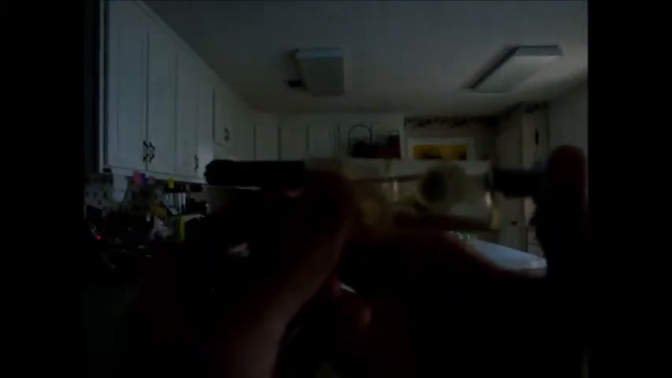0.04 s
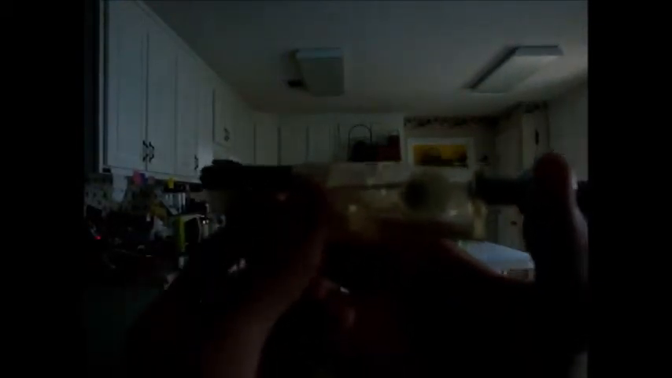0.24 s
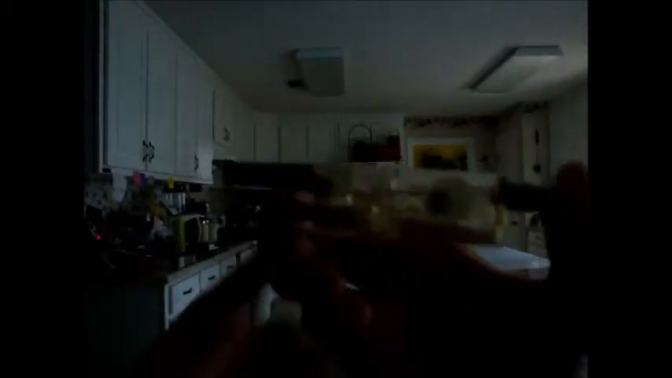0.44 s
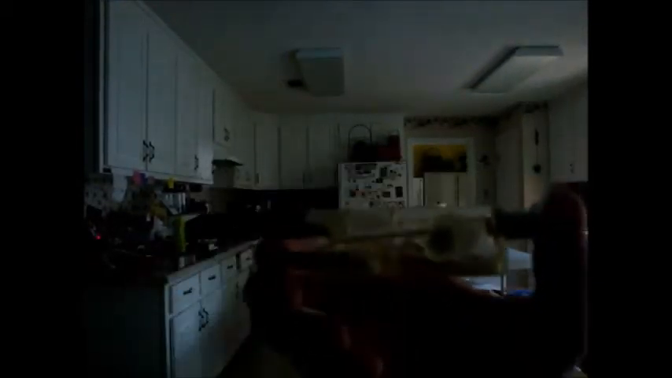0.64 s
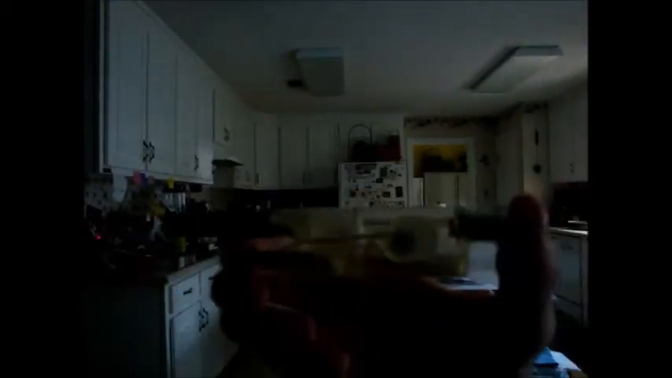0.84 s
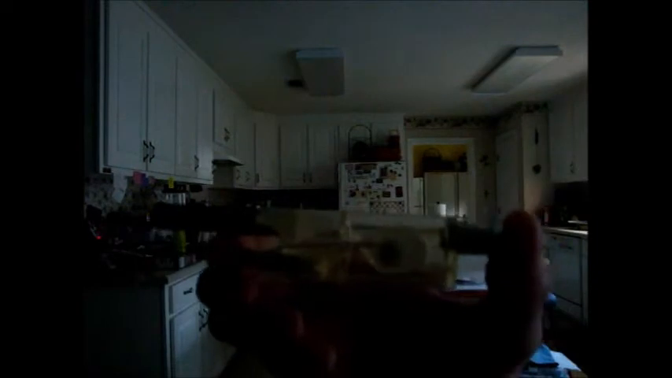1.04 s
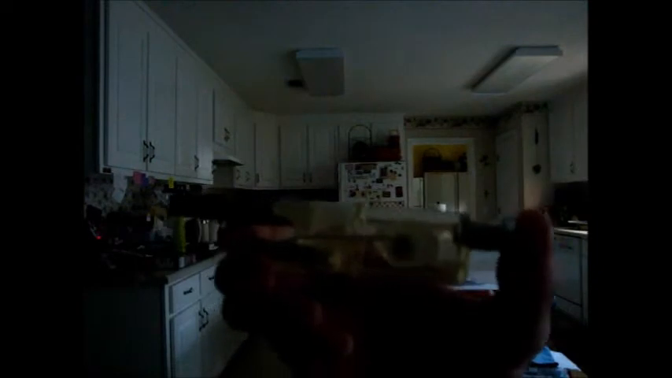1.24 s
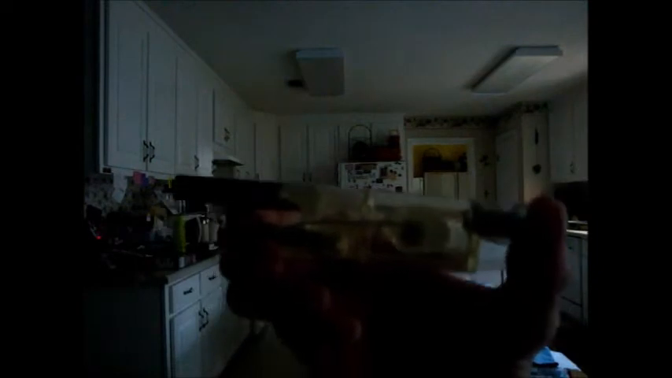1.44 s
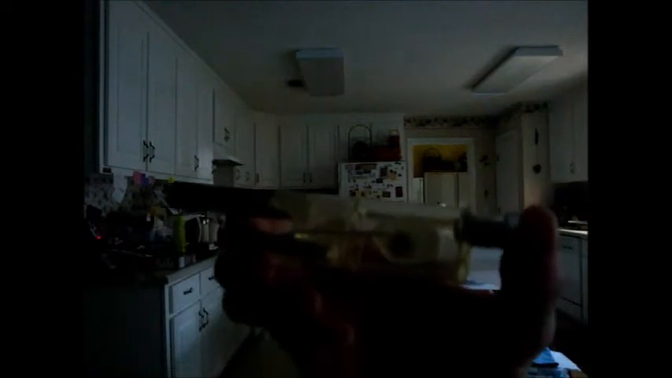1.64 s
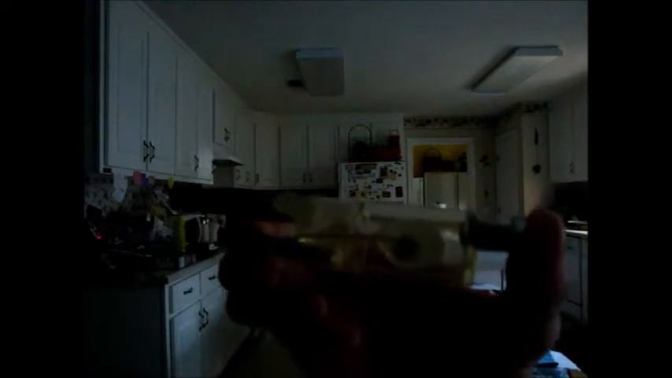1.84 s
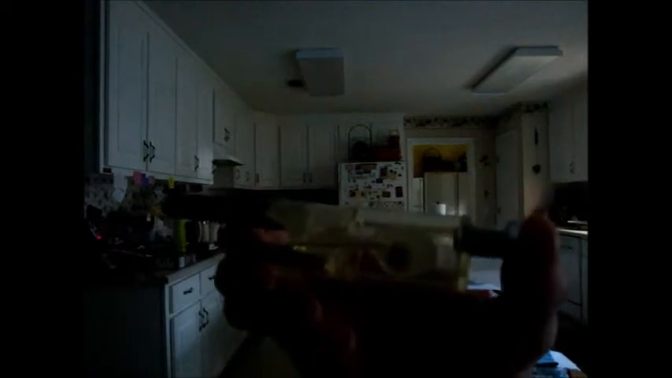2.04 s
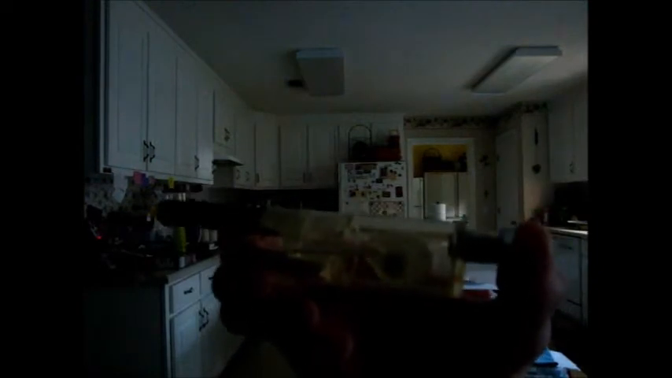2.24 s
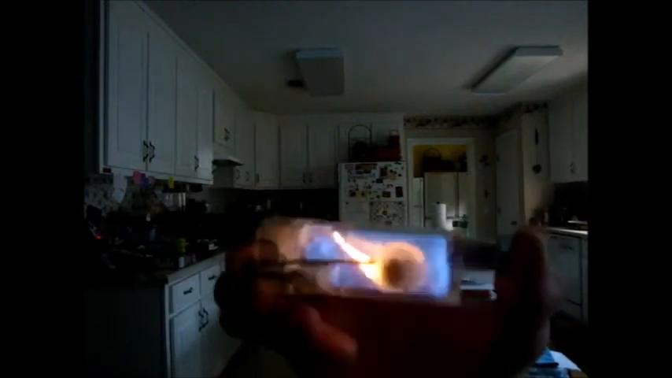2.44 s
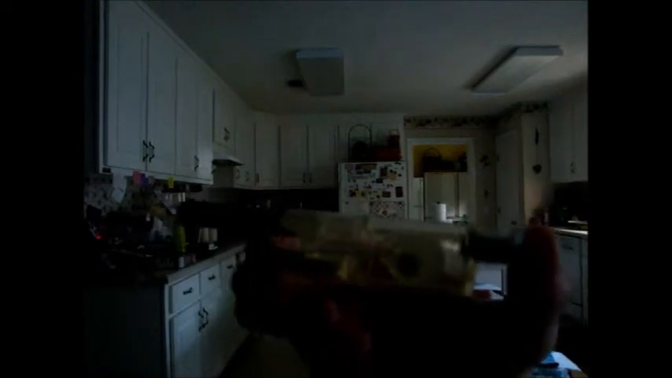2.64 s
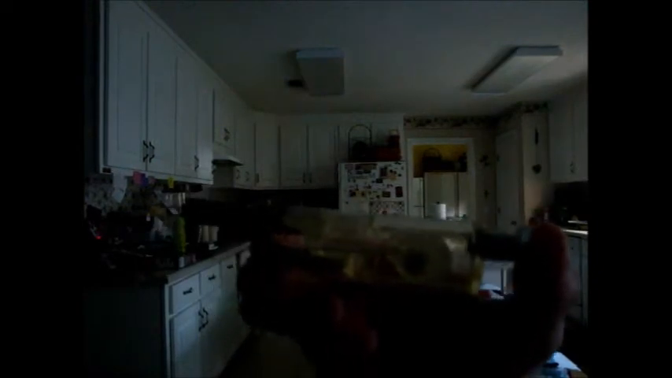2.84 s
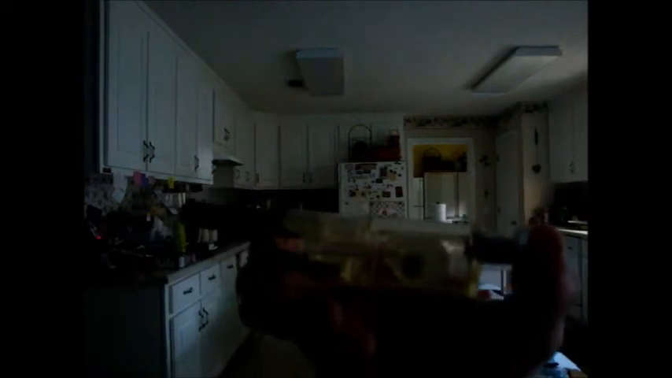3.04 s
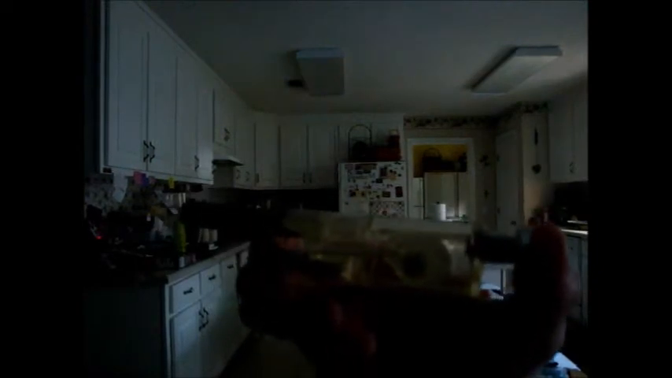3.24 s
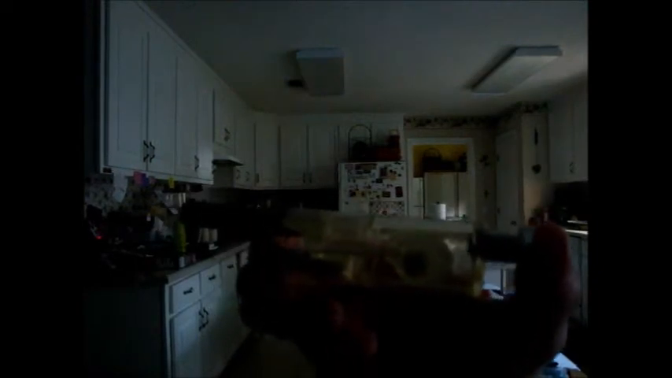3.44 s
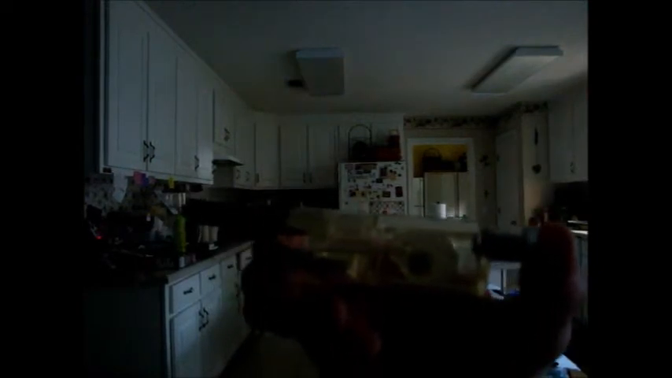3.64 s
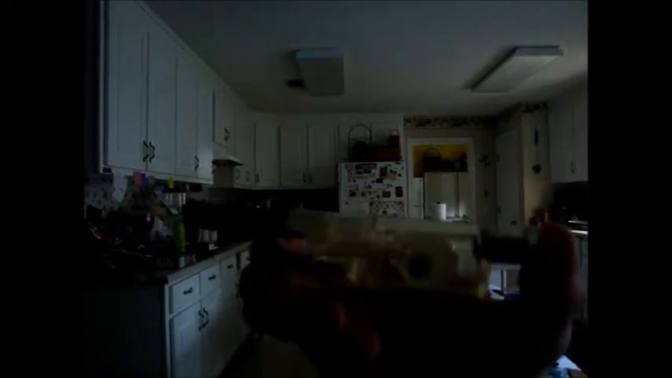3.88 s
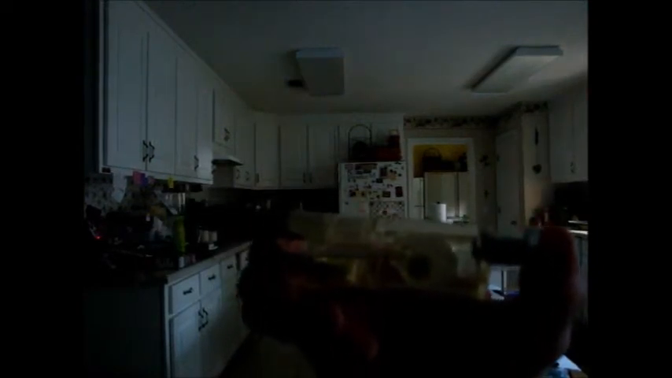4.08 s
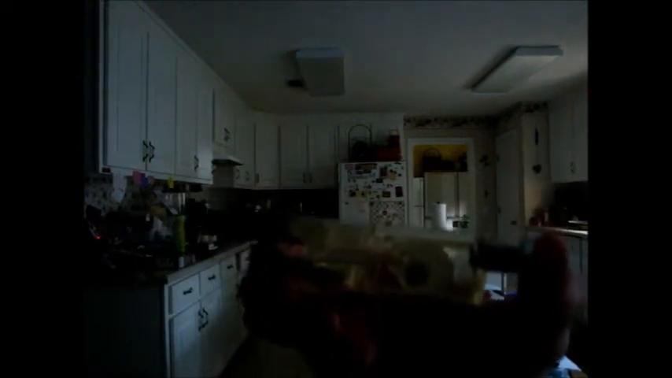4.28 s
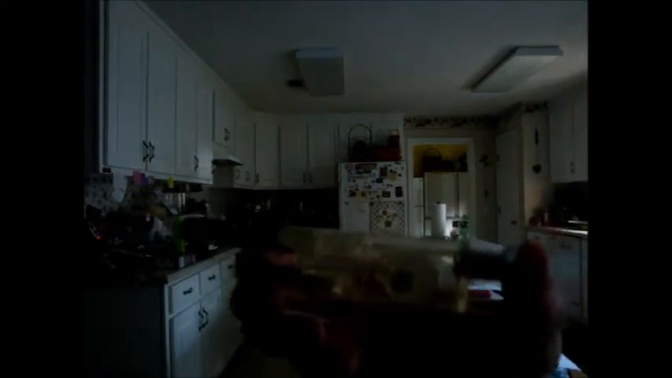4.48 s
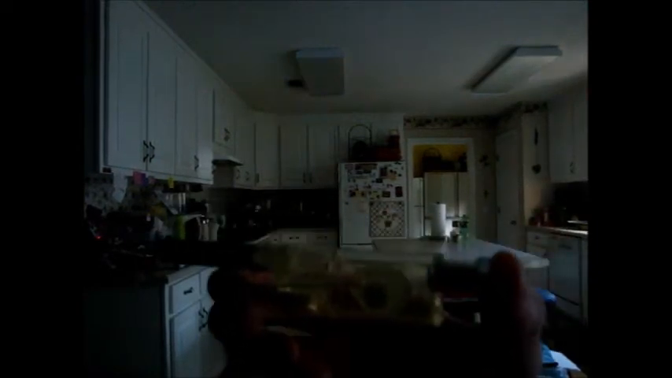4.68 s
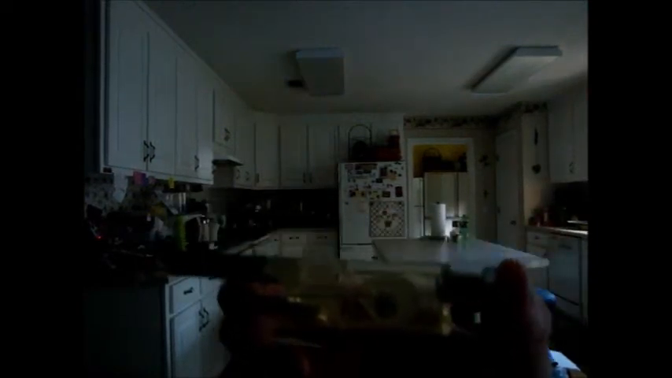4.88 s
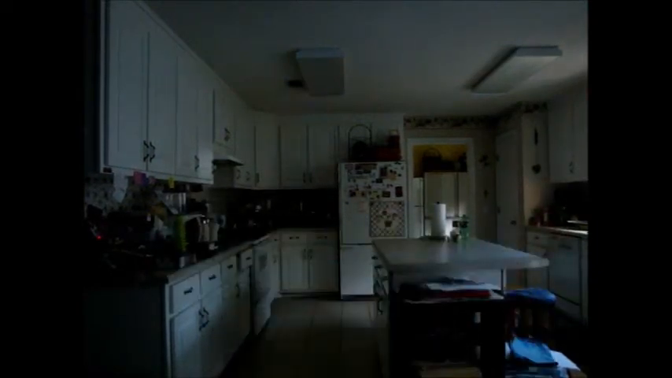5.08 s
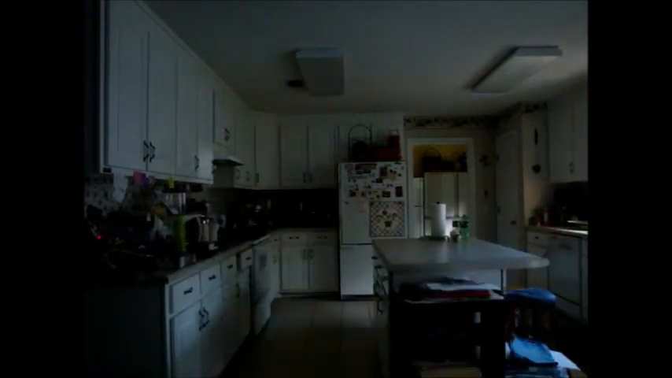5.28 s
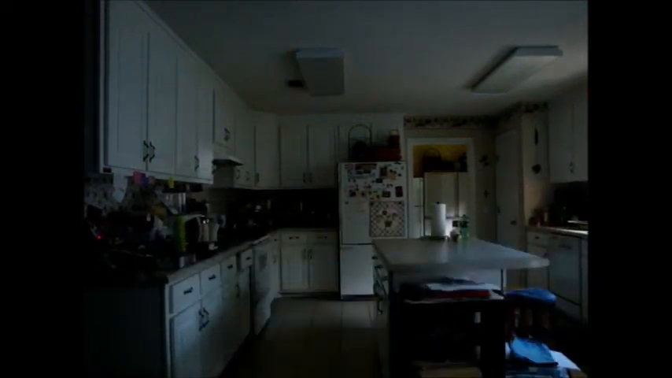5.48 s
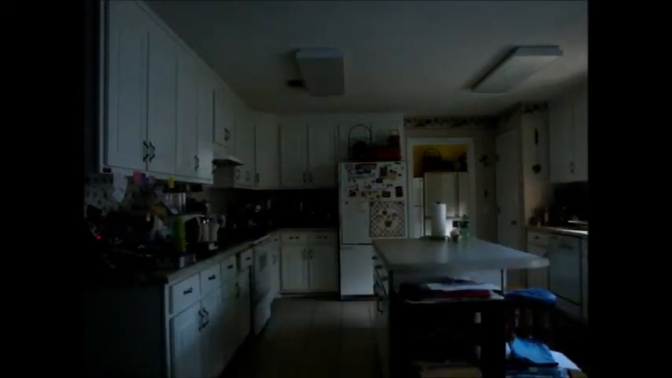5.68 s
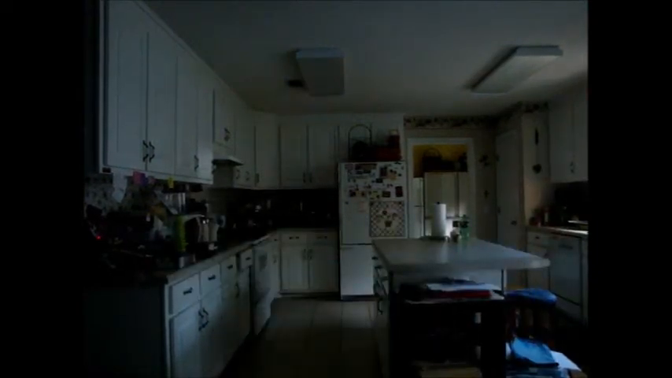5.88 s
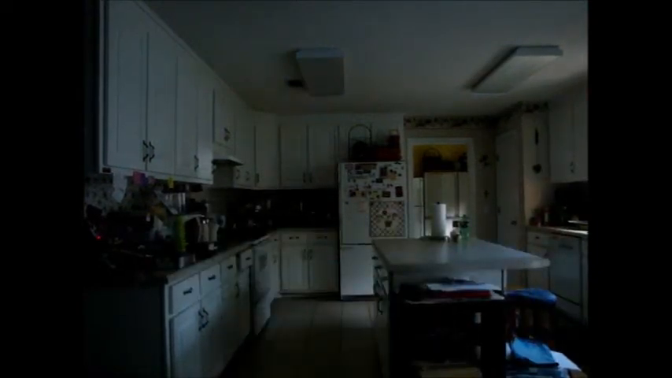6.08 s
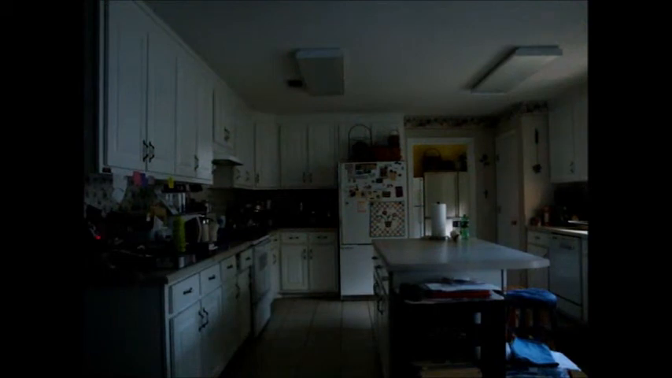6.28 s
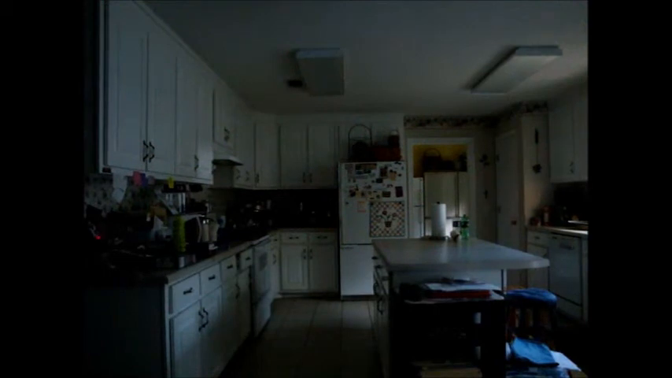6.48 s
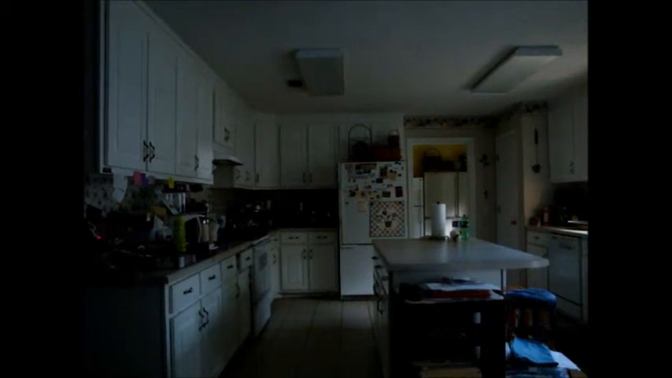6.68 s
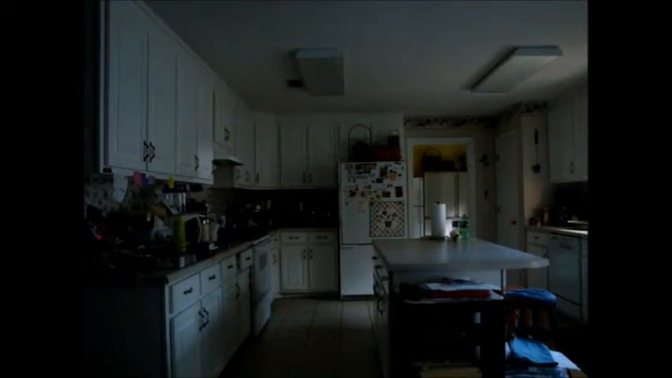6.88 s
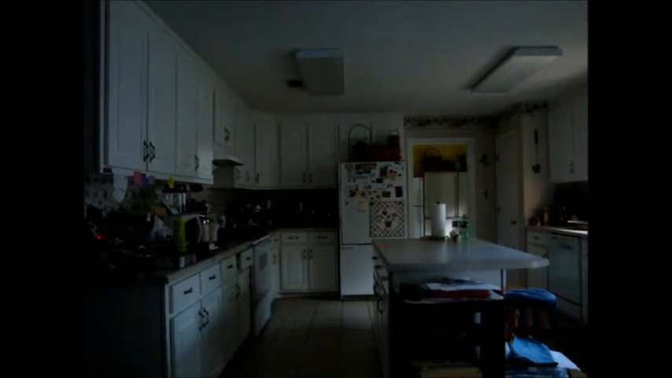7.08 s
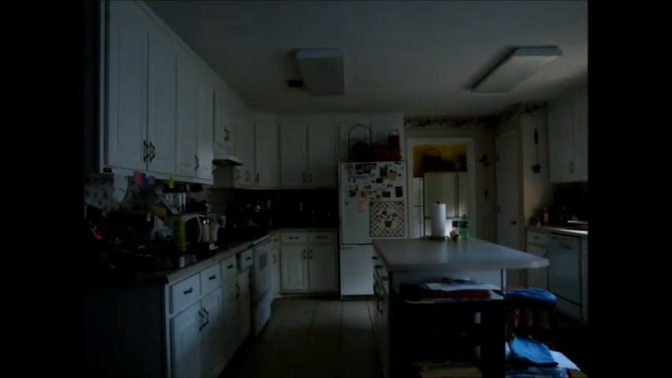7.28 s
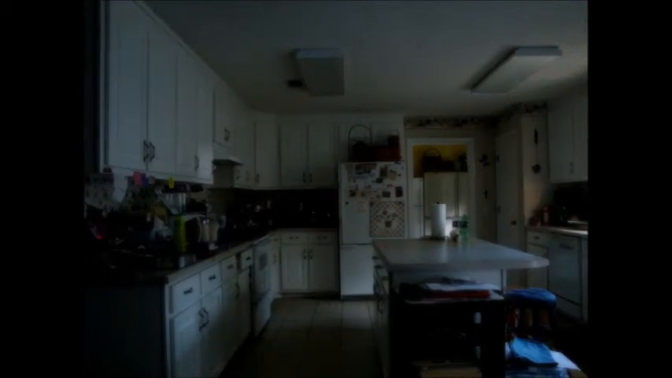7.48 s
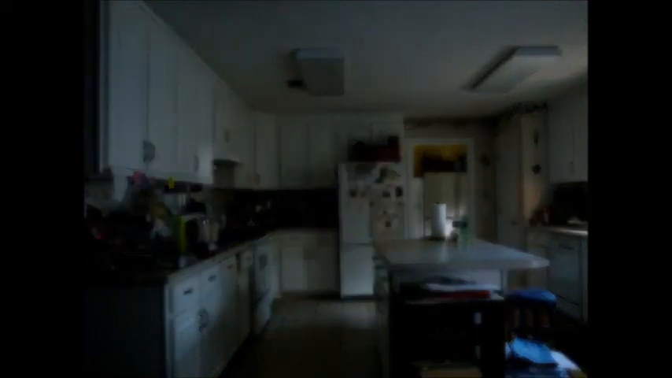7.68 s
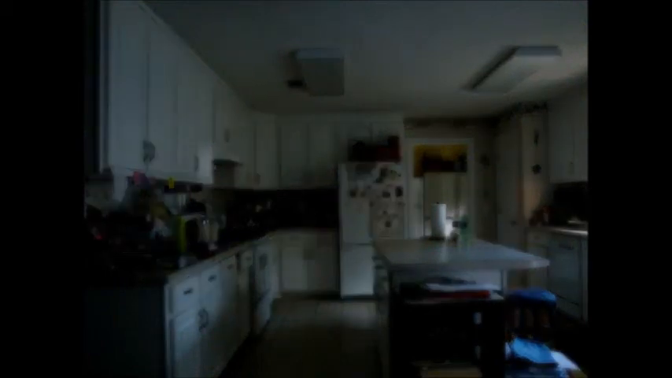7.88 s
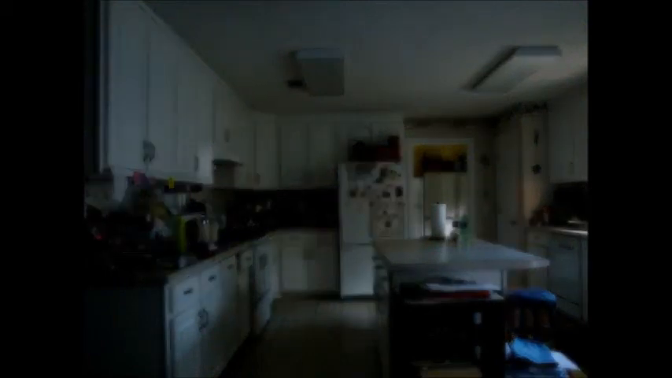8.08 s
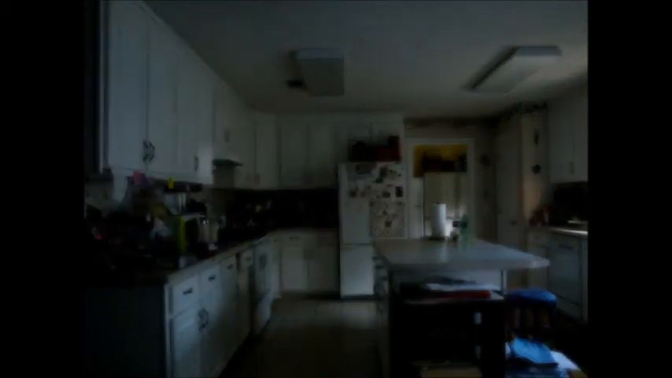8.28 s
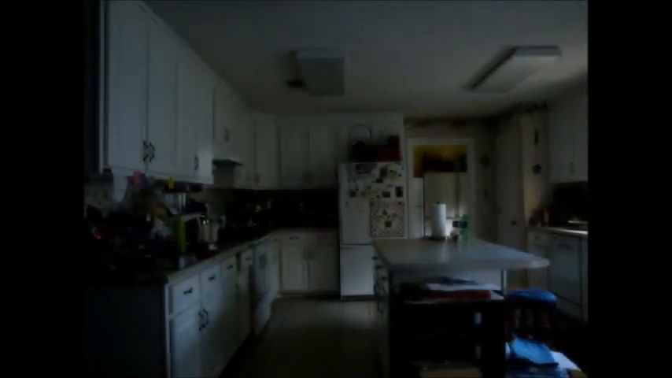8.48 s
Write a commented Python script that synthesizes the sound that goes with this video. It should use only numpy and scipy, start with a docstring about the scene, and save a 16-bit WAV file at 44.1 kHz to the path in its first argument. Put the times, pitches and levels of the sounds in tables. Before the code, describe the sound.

In a quiet hard-surfaced kitchen, a fridge hums over soft air while a camera's focus motor ticks. After early handling bumps, a tiny cannon fires with a hissing squeal and distorted bang. Echoes roar, the shot hits something that rings, then snaps on the floor. Dry plastic clicks and dull bumps follow close to the single microphone, and a second motor joins near the end.

```python
"""Hand-held mini cannon in a kitchen

Over a fridge's hum and moving air a cannon fires: flash, squeals and muzzle pop are noise bursts, glides and
pressure pulses; shaped noise dying band by band is the hard room's roar. The shot strikes something that
rings (decaying modes), then snaps on the floor. Around it come knocks, soft strokes of band noise, plastic
clicks and a ticking focus motor; late on a second motor joins. The camera's gain ducks under loud sound and
creeps back.
"""
import sys
import numpy as np
from scipy import signal
from scipy.fft import rfft, irfft
from scipy.io import wavfile
from scipy.ndimage import uniform_filter1d, map_coordinates

SR = 44100
rng = np.random.default_rng(int(sys.argv[2]) if len(sys.argv) > 2 else 0)


def master(y):
    """Save y as 16-bit WAV."""
    cut = np.clip(np.atleast_2d(y).T, -1, 1)
    pcm = np.round(cut * 32767)  # scale
    wavfile.write(sys.argv[1], SR, pcm.astype(np.int16))


N = 375732
T = np.arange(N) / SR  # s
TOP_HZ = 10080  # upper band limit

# All levels apply ahead of the camera's gain control.
# Partials of the fridge's hum: f/Hz, rms level/dB before slow drift
HUM_PARTIALS = [(120, -71.5), (240.2, -55), (402, -61.5), (431, -63.5), (720, -63), (888.5, -58)]
# Spectrum of the moving air: f/Hz, relative level/dB per Hz
AIR_SPECTRUM = [(25, -60), (70, -25), (115, -17.5), (200, -6.5), (260, -5), (310, -4), (390, -0.5),
                (470, -5), (850, -5), (1050, -7.5), (2200, -17.5), (5000, -24.5), (8600, -30.5),
                (10000, -34)]
# Spectrum of the second motor's noise: f/Hz, relative level/dB per Hz
MOTOR_SPECTRUM = [(40, -42), (110, -4.5), (230, -2.5), (450, 3), (800, -1.5), (1500, -7.5), (3000, -17),
                  (10000, -23)]

# Runs of the focus motor: start t/s, end t/s, mean step level/dB
FOCUS_RUNS = [(0.199, .44, -50), (4.083, 4.36, -48.5)]
# Spectrum of one lens step before its tilt: f/Hz, relative level/dB per Hz
LENS_SPECTRUM = [(2500, -40), (4200, 2), (5000, 2.5), (6100, -5), (7000, -20), (8700, -3.5), (10000, -21)]
# Tilt of a step (dB per octave), ring of the lens carrier (Hz), steps a second within a run
LENS_TILT_DB, LENS_HZ, STEP_RATE = 5, 5450, 60
# Single hunting steps: mean number a second, mean level (dB)
HUNT_PER_S, HUNT_DB = 7.2, -53.5

# Bumps while the cannon is handled and put down:
# t/s, level/dB, tilt/(dB per octave), t60/s, relative level of the hollow body/dB
KNOCK_EVENTS = [(0.332, -28, -18.5, 0.027, -24), (.480, -30.5, -1, 0.11, 1), (.487, -31.5, 1, 0.082, 1),
                (4.53, -37, 6, 0.025, -12), (4.545, -36, -0.5, 0.046, -16), (5.577, -33.5, 2, 0.15, 5),
                (5.678, -30, 1.5, 0.18, 4.5), (5.925, -38, 4, 0.13, -24), (6.044, -41.5, 5.5, 0.076, -26),
                (8.4387, -29.5, 0, 0.035, -9)]
# Spectrum of a knock before its tilt: f/Hz, relative level/dB per Hz
KNOCK_SPECTRUM = [(120, -28), (250, -10), (350, 3.5), (440, 1.5), (560, 2), (720, 0.5), (900, -1.5),
                  (2200, -16), (4000, -19), (6000, -31), (10000, -38)]
# Modes of the hollow body under a knock: f/Hz, relative level/dB, t60/s
HOLLOW_MODES = [(344, -9.5, 0.073), (462, -4, 0.096), (584, 0.5, 0.069), (657, -16.5, 0.12)]
# Rise (s) and unevenness of the scrape (dB)
KNOCK_ATTACK_S, SCRAPE_DB = 0.0014, 0.5
# A knock with t60 of KNOCK_RING_S gets KNOCK_ROOM_DB of room; the amplitude is proportional to t60
KNOCK_RING_S, KNOCK_ROOM_DB = 0.15, -7.5

# Soft strokes of band noise: a low bump, handling rubs, a breath-like swell with narrow resonances near 4.6 s,
# a high motor hiss near 7 s: t/s, length/s, rise/s, centre f/Hz, width/Hz, level/dB
SOFT_STROKES = [(0.455, 0.11, 0.022, 1650, 1700, -38), (1.087, 0.068, .02, 152, 80, -48.5),
                (4.58, .055, .03, 2730, 110, -44.5), (4.559, 0.098, .015, 3300, 1900, -51.5),
                (4.607, 0.14, 0.013, 1086, 70, -47), (5.926, 0.027, .004, 920, 300, -43),
                (5.927, 0.077, 0.0025, 1740, 480, -43.5), (5.926, 0.055, .004, 4600, 2200, -51.5),
                (6.934, 0.075, .004, 5660, 1010, -47), (7.012, 0.017, .004, 6950, 4500, -46),
                (8.42, 0.054, .004, 1260, 350, -47.5)]
# Fall over the stroke (dB), release t60 (s), depth of the grain (dB)
STROKE_FALL_DB, STROKE_RELEASE_S, STROKE_GRAIN_DB = 6.5, 0.12, 2.6

# The fuel ignites, the muzzle opens, the shot hits across the room, the shot reaches the floor (s)
IGNITION, MUZZLE, HIT, FALL = 2.4289, 2.4446, 2.643, 3.1478
# Gas squealing out of the chamber: t/s, length/s, start f/Hz, end f/Hz, level/dB
GAS_SQUEALS = [(2.427, 0.025, 3520, 3670, -15.5), (2.4456, 0.0021, 2640, 2820, -5.5),
               (2.453, 0.011, 2350, 2940, -6.5)]
# Spectrum of the flash: f/Hz, relative level/dB per Hz
FLASH_SPECTRUM = [(100, -27.5), (1000, -14), (2300, -8.5), (3700, -0.5), (5000, -1), (6300, 8.5),
                  (8000, -7), (10000, -16)]
# Spectrum of the muzzle blast: f/Hz, relative level/dB per Hz
BLAST_SPECTRUM = [(88, -65), (150, -31.5), (250, -57.5), (349, -30), (387, -29), (454, -31), (796, -15.5),
                  (1240, -12), (1640, -6.5), (2290, -4.5), (2500, -1.5), (2970, -7), (4150, -7.5),
                  (7820, -17.5), (10000, -20), (13000, -57), (22000, -120)]
# Hardest echoes of the muzzle pop off the cupboards: t/s, level/dB
CUPBOARD_ECHOES = [(2.4998, -2), (2.506, -2.5), (2.512, -8), (2.5258, -4), (2.545, -3)]
# Each such echo: centre and width (Hz), rise constant and t60 (s)
ECHO_HZ, ECHO_WIDTH_HZ, ECHO_RISE_S, ECHO_T60_S = 2630, 440, 0.00057, 0.049
# Pressure pushes at ignition, muzzle and hit (dB); duration of overpressure at the first two (s)
IGNITION_PUSH_DB, MUZZLE_PUSH_DB, HIT_PUSH_DB, PUSH_S = -4.5, 17, -26, 0.00017
# The muzzle's push comes back from the nearest wall (s, dB)
WALL_S, WALL_DB = 2.4615, 16.5

# Decay of the kitchen's reverberation: f/Hz, t60/s
REVERB_DECAY = [(150, 1), (500, 0.33), (1300, 0.65), (2700, 0.51), (6000, 0.5), (10000, 0.37)]
# How far single pitches and early clumps stand out in the room's answer (dB)
COMB_DB, CLUMP_DB = 1.44, 3

# Spectrum of the strike across the room: f/Hz, relative level/dB per Hz
STRIKE_SPECTRUM = [(180, -90), (300, -58), (420, -27), (490, -18), (850, -21), (1340, -6.5), (1500, -8.5),
                   (1770, -9), (5900, -8.5), (10000, -13.5), (13000, -44), (22000, -120)]
# Modes of the struck thing: f/Hz, level/dB, t60/s
STRUCK_THING_MODES = [(1295, -19, 0.54), (1345, -19, 0.63), (1380, -10, 0.37), (1420, -9, 0.13)]
# Spectrum of the snap on the floor before its tilt: f/Hz, relative level/dB per Hz
SNAP_SPECTRUM = [(240, -38), (400, -20), (422, -6), (568, -15), (658, -8), (806, -6), (1070, -3),
                 (1670, -4.5), (4060, -0.5), (10000, -4), (13000, -38), (22000, -120)]
# The snap's faint lead-in, its main burst and a second burst 3 ms later:
# t/s, level/dB, t60/s, tilt/(dB per octave)
SNAP_BURSTS = [(3.146, -30, .03, -1), (3.148, -17.5, .017, 0), (3.151, -16.5, 0.017, 1)]
# Modes of the falling shot: f/Hz, relative level/dB, t60/s
SHOT_PARTIALS = [(1394, -5.5, 0.21), (2525, -4.5, 0.19), (3410, -2.5, 0.14), (4160, -2.5, 0.19),
                 (6980, -2, 0.13), (8050, -4, 0.16)]
# How long that ring lingers in the room (t60, s), and its gain (dB)
LINGER_S, LINGER_DB = 0.34, -38

# Clicks of the casing: t/s, peak level of direct sound/dB, driven f/Hz, crack tilt/(dB per octave),
# room level against that peak/dB
CLICK_EVENTS = [(3.8638, -28, 3100, 3, -43), (3.8666, -27.5, 3530, -1, -40), (4.4941, -15.5, 3470, 5, -33),
                (4.4941, -16.5, 7400, 5, -29), (4.84, -37.5, 3400, -6, -32), (6.682, -31, 3250, -10, -40),
                (6.7142, -14.5, 1680, -11, -47), (6.715, -11.5, 5130, -8.5, -49),
                (7.033, -26, 5240, 4, -25), (7.234, -22, 3800, 8, -35), (7.2382, -25, 8160, 5, -37),
                (7.47, -30, 4730, -6, -35)]
# Spectrum of a click's crack before its tilt: f/Hz, relative level/dB per Hz
CRACK_SPECTRUM = [(300, -32), (1000, -14), (2100, 4), (3100, 0.5), (4800, 0), (6300, 7), (8000, -3),
                  (9600, 2.5)]
# Modes of the plastic casing: f/Hz, relative level/dB, t60/s
CASING_MODES = [(1250, 1, 0.019), (1390, -4, 0.033), (2160, 9, 0.0097), (3150, -4.5, 0.007),
                (3710, 3.5, 0.012), (4880, 0, 0.0096), (5520, 6, 0.0072), (6030, 2.5, .007),
                (9650, 4, .007)]
# Loss of a mode per octave from the driven pitch (dB), crack's relative level (dB) and t60 (s), rise (s)
OFF_PITCH_DB, CRACK_DB, CRACK_T60_S, CLICK_ATTACK_S = 28.5, -7, 0.014, 0.00011

OVERLOAD = .88  # ceiling that the camera's overload approaches (full scale 1)


def amp(db):
    """Logarithmic level: decibels to amplitude gain."""
    return 10 ** (np.asarray(db) / 20)


def unit(x):
    """Normalization: scale to rms 1."""
    return x / np.sqrt(np.mean(x ** 2) + 1e-20)


def along(points, hz):
    """Logarithmic interpolation of (f/Hz, value) points over frequency."""
    f, v = np.transpose(points)
    return np.interp(np.log(hz + 1), np.log(f + 1), v)


def fade(t, t60):
    """Exponential decay: 60 dB in t60 seconds."""
    return np.exp(-np.log(1000) * t / t60)


def wobble(rate):
    """Slow random fluctuation: a smooth curve through rate random knots a second."""
    knots = rng.standard_normal(int(N * rate / SR) + 4)
    return map_coordinates(knots, [T * rate])


def coloured_noise(spectrum, size, tilt_db=0):
    """Spectral shaping: noise of rms 1, tilted by tilt_db an octave above 300 Hz."""
    hz = np.fft.rfftfreq(size, 1 / SR)
    octaves = np.log2(np.maximum(hz, 300))
    gain = amp(along(spectrum, hz) + tilt_db * octaves) * (hz < TOP_HZ)
    return unit(irfft(rfft(rng.standard_normal(size)) * gain, size))


def resonant_noise(centre_hz, width_hz):
    """Modal overlap: close modes merge into one second of band noise, rms 1, weak far below centre.

    Centred on 0 Hz it is a slow random curve.
    """
    hz = np.fft.rfftfreq(SR, 1 / SR)
    radiation = np.minimum(1, (2 * hz + 1) / (centre_hz + 1))
    resonance = 1 / (1 + (2 * (hz - centre_hz) / width_hz) ** 2)
    return unit(irfft(rfft(rng.standard_normal(SR)) * radiation * resonance, SR))


def modes(table):
    """Modal superposition: one second of decaying partials, each starting at a chance phase."""
    t = T[:SR]
    return sum(amp(db) * np.sin(2 * np.pi * (hz * t + rng.random())) * fade(t, t60)
               for hz, db, t60 in table)


def low_cut(x):
    """Radiation efficiency: small things radiate little bass."""
    return signal.sosfilt(signal.butter(3, 240, "high", fs=SR, output="sos"), x)


def push(length):
    """Blast wave: sharp overpressure for length seconds, drawn negative, then a weaker suction."""
    u = T[:SR] / length
    return -(1 - u) * np.exp(-u)


def burst(spectrum, t60, tilt_db=0):
    """Impact radiation: the direct sound of a blow is decaying noise."""
    return low_cut(coloured_noise(spectrum, SR, tilt_db) * fade(T[:SR], t60))


def room(spectrum, build, hold=0, tilt_db=0):
    """Reverberation: echoes thicken over build, last while fed for hold, then die band by band."""
    hz = np.fft.rfftfreq(SR, 1 / SR)
    # paths between the hard cupboards add and cancel, so some pitches stand out
    delays = rng.uniform(.001, .022, (28, 1))  # s
    comb = unit(np.cos(2 * np.pi * delays * hz).sum(axis=0))
    echoes = unit(irfft(rfft(coloured_noise(spectrum, SR, tilt_db)) * amp(COMB_DB * comb), SR))
    # early echoes arrive in clumps, late ones evenly
    echoes = echoes * amp(CLUMP_DB * resonant_noise(0, 250) * fade(T[:SR], 0.99))
    hz, t, bands = signal.stft(echoes, SR, nperseg=256)
    decay = fade(np.maximum(t - hold, 0), along(REVERB_DECAY, hz)[:, None])
    tail = signal.istft(bands * decay, SR)[1][:SR]
    return low_cut(tail * (1 - np.exp(-(T[:SR] / build) ** 2)))


def add(track, s, sound):
    """Linear superposition: mix a sound in at time s."""
    part = track[round(s * SR):][:len(sound)]
    part += sound[:len(part)]


def kitchen():
    """Steady tonal and broadband sources: fridge hum over moving air; late on a second motor joins in."""
    hum = sum(amp(db + 2.2 * wobble(3.61)) * np.sqrt(2)
              * np.sin(2 * np.pi * hz * T + 0.2 * wobble(2.7)) for hz, db in HUM_PARTIALS)
    air = amp(-48.0 + 0.92 * wobble(3.68)) * coloured_noise(AIR_SPECTRUM, N)
    # the second motor's drone stands about a quarter cycle from the fridge's, so their powers add
    drone_phase = 2 * np.pi * HUM_PARTIALS[1][0] * T + 0.16 * wobble(6.1)
    drone = amp(-50.5 + 1.5 * wobble(9.2)) * np.sqrt(2) * np.cos(drone_phase)
    motor = drone + amp(-48.0 + 0.35 * wobble(8)) * coloured_noise(MOTOR_SPECTRUM, N)
    return hum + air + motor * np.interp(T, [7.365, 7.395], [0, 1])


def focus_motor():
    """Stepwise excitation: lens steps, in runs or singly, each give a thin tick of varying strength."""
    out, t = np.zeros(N), T[:SR // 50] - .006
    tick = unit(np.sin(2 * np.pi * LENS_HZ * t) * np.exp(-(t / 0.00036) ** 2))
    steps = [(s, db) for start, end, db in FOCUS_RUNS for s in np.arange(start, end, 1 / STEP_RATE)]
    # the lens hunts in single steps at chance slots throughout
    slots = np.arange(1 / STEP_RATE, T[-1], 1 / STEP_RATE)
    hunting = rng.random(len(slots)) < HUNT_PER_S / STEP_RATE
    steps += [(s, HUNT_DB) for s in slots[hunting]]
    for s, db in steps:
        # friction differs from step to step
        rasp = coloured_noise(LENS_SPECTRUM, len(t), LENS_TILT_DB) * np.exp(-(t / 0.0025) ** 2)
        add(out, s - .004, amp(db + rng.normal(0, 1.6)) * (0.35 * tick + 0.73 * rasp))
    return out


def knocks():
    """Impact on a hollow body: a dull scrape excites modes; the longer it lasts, the more room it feeds."""
    out = np.zeros(N)
    rise = 1 - np.exp(-T[:SR] / KNOCK_ATTACK_S)
    for s, db, tilt_db, t60, body_db in KNOCK_EVENTS:
        unevenness = amp(SCRAPE_DB * resonant_noise(0, 360))
        scrape = coloured_noise(KNOCK_SPECTRUM, SR, tilt_db) * unevenness * fade(T[:SR], t60)
        direct = low_cut(rise * (scrape + amp(body_db) * modes(HOLLOW_MODES)))
        room_gain = amp(KNOCK_ROOM_DB) * t60 / KNOCK_RING_S
        echo = room_gain * room(KNOCK_SPECTRUM, build=0.019, tilt_db=tilt_db)
        add(out, s, amp(db) * (direct + echo))
    return out


def soft_strokes():
    """Amplitude-modulated band noise: each soft stroke swells, eases off and dies with a random grain."""
    out, t = np.zeros(N), T[:SR]
    for s, length, rise, hz, width_hz, db in SOFT_STROKES:
        stroke = (1 - np.exp(-t / rise)) * amp(-STROKE_FALL_DB * t / length)
        stroke = stroke * fade(np.maximum(t - length, 0), STROKE_RELEASE_S)
        # a narrower band has a slower grain
        grain = amp(STROKE_GRAIN_DB * resonant_noise(0, width_hz / 10))
        add(out, s, amp(db) * stroke * unit(resonant_noise(hz, width_hz) * grain))
    return out


def cannon():
    """Rapid gas expansion: the charge hisses and squeals, the muzzle pops and echoes surge in the room."""
    out = np.zeros(N)
    flash = amp(-16.0) * burst(FLASH_SPECTRUM, t60=0.44)
    add(out, IGNITION, flash + amp(IGNITION_PUSH_DB) * push(PUSH_S))
    for s, length, start_hz, end_hz, db in GAS_SQUEALS:
        count = int(length * SR)
        phase = 2 * np.pi * np.cumsum(np.linspace(start_hz, end_hz, count)) / SR
        envelope = signal.windows.tukey(count, .25) * (1 + 0.1 * resonant_noise(0, 490)[:count])
        add(out, s, amp(db) * np.sin(phase) * envelope)
    pop = burst(BLAST_SPECTRUM, t60=0.03)
    add(out, MUZZLE, pop + amp(MUZZLE_PUSH_DB) * push(PUSH_S))
    add(out, MUZZLE, amp(-2.0) * room(BLAST_SPECTRUM, build=0.021, hold=0.096))
    add(out, WALL_S, amp(WALL_DB) * push(length=.00008))
    surge = (1 - np.exp(-T[:SR] / ECHO_RISE_S)) * fade(T[:SR], ECHO_T60_S)
    for s, db in CUPBOARD_ECHOES:
        add(out, s, amp(db) * surge * resonant_noise(ECHO_HZ, ECHO_WIDTH_HZ))
    return out


def projectile():
    """Impulsive modal excitation: the shot hits something that rings, then falls and snaps on the floor."""
    out, t = np.zeros(N), T[:SR]
    rung = modes(STRUCK_THING_MODES) * (1 - np.exp(-t / 0.0088))
    strike = amp(-12.0) * burst(STRIKE_SPECTRUM, t60=0.044)
    add(out, HIT, strike + amp(-5.0) * room(STRIKE_SPECTRUM, build=0.012) + rung)
    add(out, HIT, amp(HIT_PUSH_DB) * push(length=0.00087))
    for s, db, t60, tilt_db in SNAP_BURSTS:
        add(out, s, amp(db) * burst(SNAP_SPECTRUM, t60, tilt_db))
    add(out, FALL, amp(-7) * low_cut(push(length=.00004)))
    shot_ring = amp(-22.5) * low_cut(modes(SHOT_PARTIALS))
    diffuse_ring = sum(amp(db) * resonant_noise(hz, 40) for hz, db, _ in SHOT_PARTIALS)
    linger = amp(LINGER_DB) * diffuse_ring * fade(t, LINGER_S)
    echo = amp(-16.5) * room(SNAP_SPECTRUM, build=0.027) * fade(t, 3.0)
    add(out, FALL, shot_ring + linger + echo)
    return out


def clicks():
    """Near-field modal excitation: a nearly dry crack at the microphone drives the casing's nearest modes."""
    out, t = np.zeros(N), T[:SR]
    echo = room(CRACK_SPECTRUM, build=0.042, tilt_db=-3.0)
    rise = 1 - np.exp(-t / CLICK_ATTACK_S)
    for s, db, driven_hz, tilt_db, room_db in CLICK_EVENTS:
        body = np.zeros(SR)
        for hz, mode_db, t60 in CASING_MODES:
            gain = amp(mode_db - OFF_PITCH_DB * abs(np.log2(hz / driven_hz)))
            body += gain * np.sin(2 * np.pi * hz * t) * fade(t, t60)
        crack = amp(CRACK_DB) * burst(CRACK_SPECTRUM, CRACK_T60_S, tilt_db)
        click = low_cut((body + crack) * rise)
        add(out, s, amp(db) * (click / np.abs(click).max() + amp(room_db) * echo))
    return out


def scene():
    """Superposition at one point: a single microphone feeds both channels."""
    mono = kitchen() + focus_motor() + knocks() + soft_strokes() + cannon() + projectile() + clicks()
    return np.array([mono, mono])


def gain_control(x, limit_db, recovery_db):
    """Level compression: 10 ms power above the limit cuts gain, which recovers by recovery_db a second."""
    power = uniform_filter1d(x[0] ** 2, size=441, origin=190)  # window lies mostly in the past
    level = 10 * np.log10(np.abs(power) + 1e-12)
    excess = np.maximum(level - limit_db, 0)
    cut = np.maximum.accumulate(excess + recovery_db * T) - recovery_db * T
    return x * amp(-cut)


def record(dry):
    """Transducer limits: the camera's gain control, a little hiss, overload and a steep band limit."""
    x = gain_control(dry, limit_db=-11.5, recovery_db=8.5)
    x = x + amp(-58.5) * rng.standard_normal(N)
    x = x / (1 + (x / OVERLOAD) ** 4) ** (1 / 4)
    hz = np.fft.rfftfreq(N, 1 / SR)
    return irfft(rfft(x) / np.sqrt(1 + (hz / TOP_HZ) ** 300), N)


dry = scene()
out = record(dry)
master(out)
```